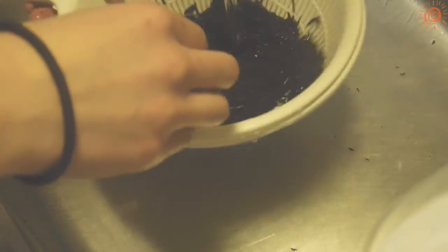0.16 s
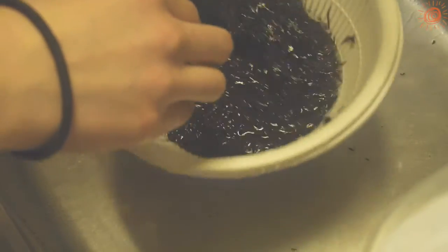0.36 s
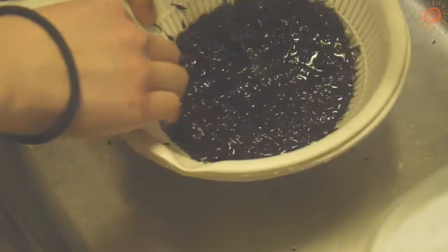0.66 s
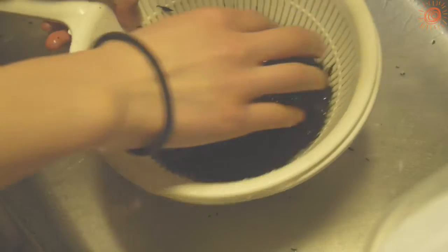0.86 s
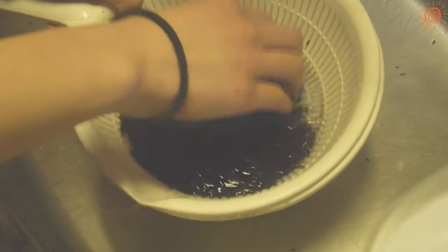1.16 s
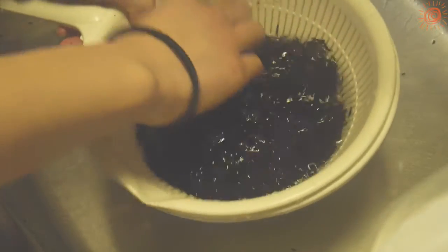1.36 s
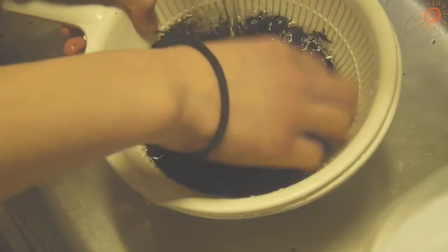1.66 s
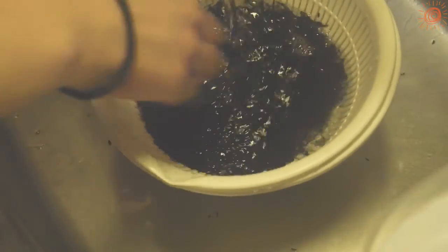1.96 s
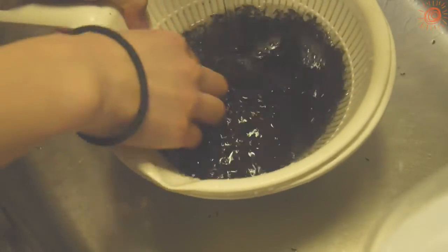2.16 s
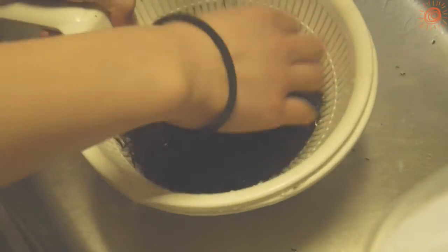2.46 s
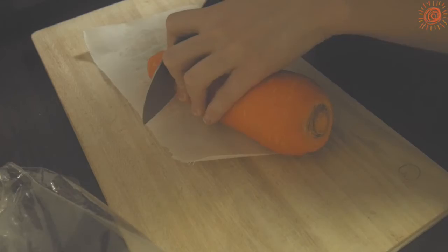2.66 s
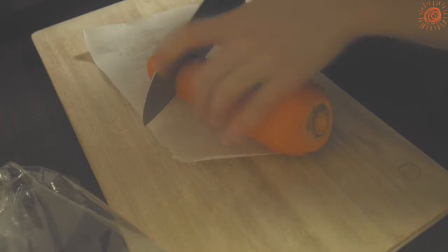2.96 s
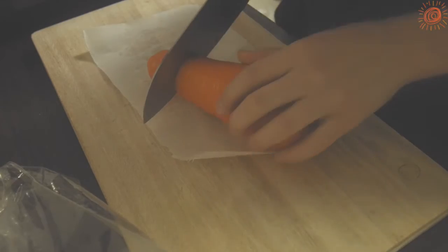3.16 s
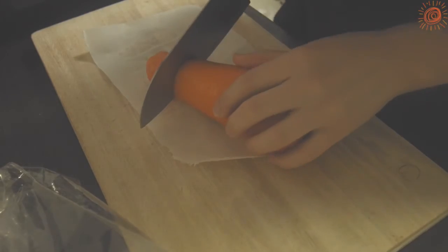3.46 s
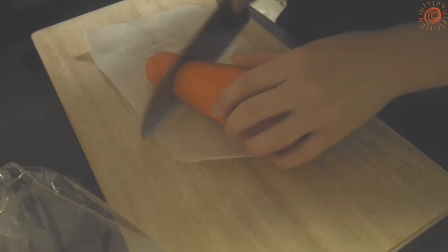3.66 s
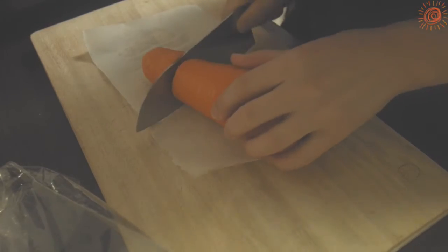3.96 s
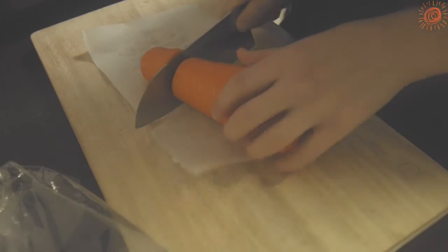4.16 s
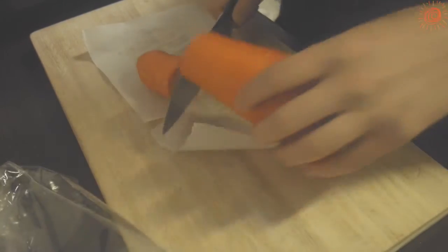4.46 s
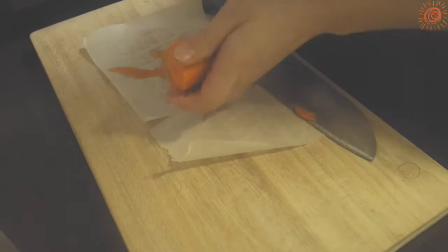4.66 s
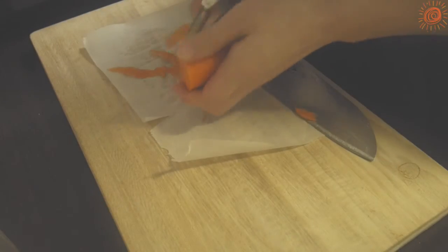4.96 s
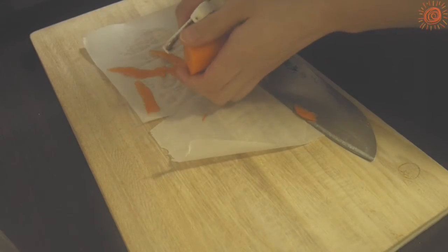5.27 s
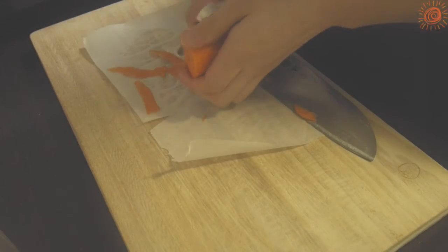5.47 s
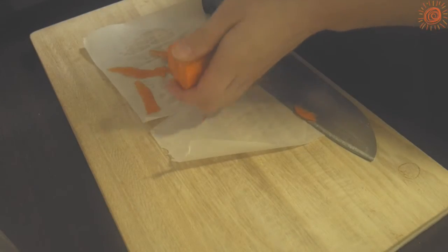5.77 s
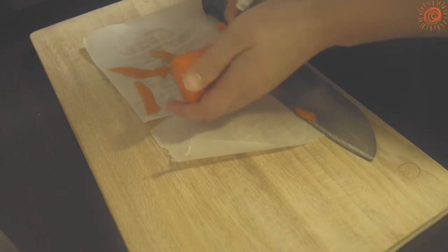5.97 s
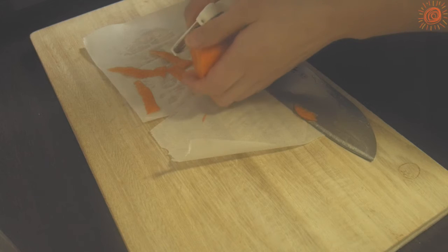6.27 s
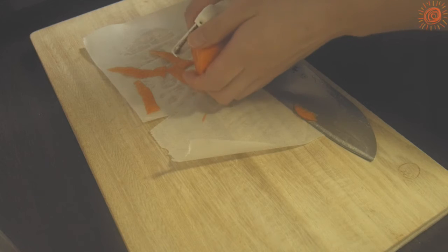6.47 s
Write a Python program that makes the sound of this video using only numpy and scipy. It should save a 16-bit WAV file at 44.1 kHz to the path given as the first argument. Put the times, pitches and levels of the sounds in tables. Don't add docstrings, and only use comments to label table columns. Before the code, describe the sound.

Bright rushing sink water stops abruptly; in a humming kitchen a blade thuds through a carrot onto wood, drags over paper, then a peeler scrapes.

```python
import sys
import numpy as np
from scipy import signal
from scipy.fft import rfft, irfft, next_fast_len
from scipy.io import wavfile
from scipy.ndimage import uniform_filter1d, map_coordinates

SR = 44100
rng = np.random.default_rng(int(sys.argv[2]) if len(sys.argv) > 2 else 0)


def gain_from_decibels(decibels):
    exponent = np.asarray(decibels, float) / 20
    return 10 ** exponent


def digitize_waveform(pressure):
    field = np.atleast_2d(pressure).T
    bounded = np.clip(field, -1, 1)
    quanta = np.round(bounded * 32767).astype(np.int16)
    wavfile.write(sys.argv[1], SR, quanta)


N = 291060
T = np.arange(N) / SR
TABLE = slice(N - 180000, N)


def unit(x):
    return x / np.sqrt(np.mean(x ** 2) + 1e-20)


def along(points, hz):
    f, v = np.transpose(points)
    return np.interp(np.log(hz + 1), np.log(f + 1), v)


def curves(rows):
    s, first, *others = np.transpose(rows)
    return [np.interp(T, s, first, -150, -150)] + [np.interp(T, s, c) for c in others]


def wobble(rate):
    return map_coordinates(rng.standard_normal(int(N * rate / SR) + 4), [T * rate])


def filtered(x, response):
    n = x.shape[-1]
    m = next_fast_len(n + 8192)
    return irfft(rfft(x, m) * response(np.fft.rfftfreq(m, 1 / SR)), m)[..., :n]


def peak(hz, centre_hz, width_hz):
    damping = 1j * hz * width_hz
    return damping / (centre_hz ** 2 - hz ** 2 + damping + 1e-9)


def body(spectrum, peaks=(), peak_db=0):
    def gain(hz):
        power = gain_from_decibels(along(spectrum, hz)) ** 2
        for centre_hz, width_hz, db in peaks:
            power = power + abs(gain_from_decibels(db + peak_db) * peak(hz, centre_hz, width_hz + 14) ** 2) ** 2
        return np.sqrt(power)
    return gain


def rush(span, gain, alike, lean, patchy_db, grit, lead=((1000, 0),), ripple_db=0):
    n = span.stop - span.start
    z = signal.stft(rng.standard_normal((2, n)), nperseg=256)[2]
    field = uniform_filter1d(rng.standard_normal(z.shape[1:]), size=3, axis=0)
    field = uniform_filter1d(field, size=12, axis=1)
    pair = signal.istft(z * gain_from_decibels(patchy_db * unit(field)), nperseg=256)[1][:, :n]
    impacts = np.interp(np.arange(n), np.arange(0, n, 40), rng.standard_normal(n // 40))
    mid, side = rfft(pair * gain_from_decibels(grit * impacts))
    hz = np.fft.rfftfreq(n, 1 / SR)
    comb = gain_from_decibels(ripple_db * np.interp(hz, np.arange(0, SR / 2, 30), rng.standard_normal(SR // 60)))
    turn = np.arccos(np.clip(along(alike, hz), -1, 1)) / 2
    mid, side = mid * np.cos(turn), side * np.sin(turn)
    halves = np.array([[.5], [-.5]])
    ports = gain_from_decibels(along(lean, hz) * halves) * np.exp(1j * along(lead, hz) * halves)
    sound = unit(irfft(np.array([mid + side, mid - side]) * ports * gain(hz) * comb, n))
    return np.pad(sound, ((0, 0), (span.start, N - span.stop)))


def add(track, s, sound):
    part = track[round(s * SR):][:len(sound)]
    part += sound[:len(part)]


def ring(hz, t60, attack):
    t = T[:SR // 2 + SR // 10]
    return np.sin(2 * np.pi * hz * t) * gain_from_decibels(-60 * t / t60) * (1 - np.exp(-t / attack))


def burst(t60, response, click=0, size=SR // 10):
    t = T[:size]
    noise = rng.standard_normal(size) * gain_from_decibels(-60 * t / t60)
    puff = filtered(noise + click * (t == 0), response)
    return puff / abs(puff).max()


def kitchen():
    # (frequency [Hz], density [dB per Hz])
    air_colour = [(13, -54.5), (22, -20), (69, -8), (146, -6), (235, -2), (428, -11.5), (558, -10.5),
                  (1500, -17.5), (1950, -52), (3300, -120)]
    # (frequency [Hz], width [Hz], level [dB])
    hum = [(85, 20, -6), (118, 14.4, 3.5), (158, 4, 9), (232.5, 8.4, 3.5), (365, 11.6, -8), (478, 12, -32),
           (660, 24, -2)]
    # (frequency [Hz], density [dB per Hz])
    faint_colour = [(710, -36.5), (1200, -11.5), (1360, -25), (1520, -10), (1620, -5.5), (2930, -13),
                    (5730, -17.5), (6240, -17.5), (7970, -19.5), (12500, -23), (13700, -40), (15200, -31)]
    # (frequency [Hz], left-right likeness [0-1])
    room_alike = [(60, 0.92), (130, 1), (290, 0.89), (640, 0.67), (1400, 0.91), (3070, 0.71), (6740, 0.46),
                  (14800, 0.417)]
    lean = [(100, 1.4), (8000, 1.1)]  # (frequency [Hz], left over right [dB])
    whirr_colour = [(500, -120), (900, -6), (2400, -4), (3100, 0), (3850, -3), (4100, -120)]
    air_db, faint_db, focus_db = -51, -63.5, -62.5
    focus_s, focus_end_s = 2.905, 4.16
    step_at_s, steps_per_s, step_fall_db = 3.16, 59.97, 45
    step_rest = .3
    drone_hz, drone_db = 561, -65

    air = gain_from_decibels(air_db) * rush(TABLE, body(air_colour, hum, peak_db=-1.0), room_alike, lean, patchy_db=0.5, grit=.4)
    faint = gain_from_decibels(faint_db) * rush(TABLE, body(faint_colour), room_alike, lean, patchy_db=1.2, grit=.4)
    whirr = rush(TABLE, body(whirr_colour), [(1000, .9)], lean, patchy_db=2, grit=2)
    drone_level = np.sqrt(2) * gain_from_decibels(drone_db + 1.5 * wobble(6))
    line = drone_level * np.sin(2 * np.pi * np.cumsum(drone_hz + 1.5 * wobble(5)) / SR)
    phase = (T - step_at_s) * steps_per_s % 1
    steps = unit(step_rest + gain_from_decibels(4.6 * wobble(40) - step_fall_db * phase))
    focus = gain_from_decibels(focus_db) * steps * whirr * (T > focus_s) * (T < focus_end_s)
    return air + line + faint + focus


def water():
    # (frequency [Hz], density [dB per Hz])
    spray_colour = [(1590, -37), (2700, -17), (3140, -12.5), (3580, -8.5), (4190, -10.5), (4820, 0),
                    (5640, -8.5), (5910, -1), (6180, 0), (7990, -6.5), (9860, -10.5), (10900, -3),
                    (13000, -29)]
    gush_colour = [(150, -57), (250, -14.5), (317, -29), (399, -6), (675, 0.5), (743, -7.5), (825, 1.5),
                   (1290, -8), (1560, -4.5), (1720, -3.5), (2450, -2.5), (3180, -22.5), (5390, -120)]
    # (frequency [Hz], width [Hz], level [dB])
    basin_low = [(588, 23, -8), (678, 14, 2), (823, 12, -5), (1141, 16, -0.5), (1727, 94, 1),
                 (1930, 150, -2.5), (2310, 93, -1)]
    basin_high = [(3501, 32, -3.5), (3914, 170, -8), (4410, 52, -4.5), (4860, 320, -5), (5340, 34, -1),
                  (5600, 33, -7), (6090, 240, -1.5), (6320, 95, -9), (7170, 60, -2), (7460, 66, -8),
                  (8220, 35, -14), (8520, 360, -7), (9050, 55, -2.5), (9830, 400, -5), (10200, 36, -9),
                  (10860, 110, -12), (11080, 48, -9), (11800, 160, -16.5), (12360, 85, -17)]
    # (frequency [Hz], density [dB per Hz])
    rumble_colour = [(13, -53), (22, -33), (75, -11.5), (182, -14.5), (232, -4), (268, -13), (322, -13),
                     (400, -9), (520, -17), (880, -120)]
    # (frequency [Hz], left-right likeness [0-1])
    sink_alike = [(60, 0.97), (130, 0.9), (300, 0.96), (640, 0.93), (1400, 0.96), (3000, 0.96),
                  (4800, 0.72), (6200, 1), (8000, 0.39), (10000, 0.56), (12500, 0.85)]
    # (frequency [Hz], left over right [dB])
    sink_lean = [(60, -1), (110, 1), (200, -1), (380, 0.5), (690, -0.5), (1280, -2.5), (2360, 0),
                 (4350, 1.2), (8030, -0.5), (14800, 4.5)]
    # (frequency [Hz], phase by which the left port leads [rad])
    sink_lead = [(4500, -0.024), (5700, 0.082), (7000, 1), (8000, 0.34), (8700, -1.3), (10000, 0.08),
                 (11100, 1.6), (13000, 0.17)]
    # (time [s], bubble peak [dB], bubble pitch [Hz], spatter above the bubble [dB])
    splashes = [
        (0.159, -25.5, 1440, 1),
        (1.3344, -19.5, 2740, -5),
        (1.647, -26, 3280, -2),
        (1.6515, -25, 3120, 4),
        (1.6648, -31, 3400, 9),
        (2.06, -34.5, 2600, 8),
        (2.066, -31.5, 1790, 9.5),
    ]
    sink = slice(0, 115200)
    spray_db, gush_db, rumble_db, spray_lowpass_hz = -28.5, -35.5, -53.5, 13060

    jets = body(spray_colour, basin_high, peak_db=4.5)
    spray = rush(sink, lambda hz: jets(hz) * (hz < spray_lowpass_hz), sink_alike, sink_lean,
                 patchy_db=1.07, grit=0.74, lead=sink_lead, ripple_db=2.0)
    gush = rush(sink, body(gush_colour, basin_low, peak_db=4.5), sink_alike, sink_lean,
                patchy_db=1.0, grit=1.9, lead=sink_lead, ripple_db=3.5)
    drops = np.zeros(N)
    for s, db, hz, spatter_db in splashes:
        add(drops, s, gain_from_decibels(db + 2) * ring(hz, 0.021, attack=.0005))
        add(drops, s, gain_from_decibels(db + spatter_db) * burst(0.06, lambda f: peak(f, hz, 3000) ** 3))
    rumble = gain_from_decibels(rumble_db) * rush(sink, body(rumble_colour), sink_alike, sink_lean, patchy_db=3.5, grit=0)
    spray_gain = gain_from_decibels(spray_db + 0.56 * wobble(10.02))
    gush_gain = gain_from_decibels(gush_db + 0.48 * wobble(12.57))
    return spray_gain * spray + gush_gain * gush + drops + rumble


def ticks():
    # (frequency [Hz], density [dB per Hz])
    tap_colour = [(1650, -39.5), (2800, -13), (4470, -3), (5530, -2), (7190, -0.5), (8590, -7),
                  (11800, -7.5), (13400, -34.5), (14200, -72.5)]
    # (time [s], peak [dB], high band [Hz], low resonance above
    # the peak [dB])
    paper_ticks = [(2.5568, -72, 10900, -20), (2.9074, -50.5, 3200, 9), (2.9615, -43.5, 9080, 3),
                   (3.105, -48.5, 6000, -20), (3.1607, -53.5, 3100, 8), (3.543, -49, 9500, -22),
                   (3.5618, -44, 10530, -13.5), (3.8822, -40, 4959, -5), (4.001, -42.5, 4500, -26),
                   (4.156, -43, 5170, -8), (4.2098, -56, 7000, -15)]
    steel_ticks = [(4.7107, -30.5, 9400, -15), (4.716, -35, 5500, -8), (4.755, -43.5, 7210, -7),
                   (5.0766, -32, 6200, -4), (5.084, -32, 7030, 2), (5.094, -46.5, 7000, 5),
                   (5.101, -50, 10200, 4), (5.2046, -38.5, 3200, -0.5), (5.2504, -55, 4350, 14),
                   (5.2599, -47, 5000, 7), (5.271, -40, 5500, 2), (5.281, -43, 10600, -9),
                   (5.3268, -48.5, 5770, 0), (5.4627, -34, 4410, -4), (5.4933, -28, 4430, -12),
                   (5.6004, -43, 4670, 2), (5.6190, -43, 8920, -2), (6.1968, -40.5, 7000, -8),
                   (6.205, -46, 10000, -14), (6.2914, -59, 3990, 10.5), (6.3744, -60, 5280, 11),
                   (6.4315, -44, 5500, -4), (6.4353, -36.5, 5300, -2), (6.4469, -32.5, 5070, -3),
                   (6.473, -49, 10000, 2), (6.5165, -44, 10600, -3), (6.5453, -38, 5160, -3),
                   (6.551, -38, 10300, 1), (6.5794, -42, 10500, -8)]
    chatter = [(4.6006, -16, 5400, -24), (4.6078, -31, 6080, -14), (4.6114, -14.5, 9600, -13),
               (4.613, -23.5, 6800, -19.5), (4.62, -29, 6800, -13), (5.7376, -20, 3800, -13),
               (5.7395, -11.5, 7200, -11), (5.7463, -23.5, 6500, -17), (5.7503, -18, 7000, -11),
               (5.7524, -19, 6300, -15), (5.7583, -28, 7000, -6), (5.7655, -30.5, 8000, -2),
               (5.7706, -28, 3700, -8)]
    # (low resonance [Hz], t60 [s])
    paper = (1200, 0.016)
    steel = (2050, 0.016)
    slip = (1650, 0.012)

    out, bright = np.zeros(N), body(tap_colour)
    for rows, (low_hz, t60) in [(paper_ticks, paper), (steel_ticks, steel), (chatter, slip)]:
        for s, db, high_hz, low_db in rows:
            puff = burst(t60, lambda f: (peak(f, high_hz, 1000) + 0.22) * bright(f), click=2.6)
            add(out, s, gain_from_decibels(db) * puff)
            add(out, s, gain_from_decibels(db + low_db) * burst(1.2 * t60, lambda f: peak(f, low_hz, 580) ** 2))
    return out


def stroke(s, swell, hold, db):
    rise_db, fall_db_per_s = 29.5, 428
    swelling = np.minimum(0, rise_db * (T - s) / swell)
    release = fall_db_per_s * np.maximum(0, T - s - hold)
    return np.maximum(db + swelling - release, -150)


def strokes():
    # (frequency [Hz], density [dB per Hz])
    hiss_colour = [(1760, -24), (3000, -14), (3760, -9), (3940, -9), (4270, -4.5), (4730, -6), (5130, -5),
                   (7260, -5), (7880, -8.5), (10300, -0.5), (12800, -14), (14200, -25), (15200, -39)]
    scrape_colour = [(350, -35.5), (600, -12), (1080, -7), (1200, 0.5), (1430, -7.5), (1630, -3),
                     (1810, -2.5), (3600, -8.5), (4680, -26), (7920, -120)]
    # (frequency [Hz], left-right likeness [0-1])
    rub_alike = [(600, 0.6), (1400, 0.99), (3000, 0.93), (5000, 0.63), (7000, .75), (9500, 0.58),
                 (13000, 0.42)]
    # (frequency [Hz], left over right [dB])
    rub_lean = [(60, 1.5), (110, 4), (200, 2), (380, 3), (690, -3), (1280, 0), (2360, 0), (4350, 1.5),
                (8030, 3.5), (14800, 6)]
    # (full pressure [s], swell [s], hold [s], hiss [dB], scrape above hiss [dB])
    rubs = [(2.963, 0.079, .01, -56, -1), (2.99, .04, 0.067, -65.5, -2), (3.115, 0.038, .002, -56, -4),
            (3.4, 0.33, .05, -66.5, -2), (3.493, 0.044, .002, -49, -4), (3.572, 0.053, 0.019, -55, -3.5),
            (5.076, 0.01, 0.02, -58, 8), (5.269, 0.036, 0.0053, -57, 2), (5.459, 0.0043, .004, -50, -5),
            (5.491, 0.0066, 0.052, -41.5, -7.5), (5.601, 0.0072, .005, -51, -10),
            (5.659, 0.069, 0.055, -40.5, -6.5), (5.735, 0.017, 0.016, -32.5, -5),
            (6.434, .014, .002, -59, 4), (6.52, .018, .002, -61, -9), (6.545, .013, .002, -52.5, 1.5),
            (6.595, 0.048, 0.011, -50, -8)]
    # (time [s], hiss [dB], scrape above hiss [dB])
    tear = [
        (3.66, -62, 1),
        (3.681, -53.5, -2),
        (3.6825, -46, -7),
        (3.688, -33.5, -16),
        (3.703, -26, -7.5),
        (3.7115, -24, 4.5),
        (3.722, -36.5, 1.5),
    ]
    # (time [s], hiss [dB], scrape above hiss [dB])
    drag = [
        (4.2, -67, -5),
        (4.25, -46, 6),
        (4.318, -30, -16.5),
        (4.376, -45, 0),
        (4.41, -37, -3.5),
        (4.534, -37, -12.5),
        (4.597, -43.5, 3),
        (4.612, -29, -11.5),
        (4.69, -78, 9),
    ]
    # (start [s], length [s], frequency [Hz], level [dB])
    sings = [(4.25, .065, 4000, -43), (4.40, .12, 10600, -44), (4.40, .11, 8800, -46),
             (4.40, .1, 7500, -44), (4.42, .12, 4950, -46), (4.31, .11, 4700, -53), (4.41, .08, 6900, -48),
             (4.598, .04, 12200, -48), (5.078, .05, 7100, -61), (4.55, .05, 4300, -49),
             (5.49, .06, 2300, -48), (5.5, .05, 4500, -50), (5.595, .06, 2250, -55), (5.69, .04, 4400, -50),
             (5.65, .07, 8900, -51), (5.745, .045, 7000, -47), (6.542, .026, 2310, -45),
             (6.505, .05, 10450, -62)]

    hiss = rush(TABLE, body(hiss_colour), rub_alike, rub_lean, patchy_db=2.6, grit=3.2, ripple_db=2.0)
    scrape = rush(TABLE, body(scrape_colour), rub_alike, rub_lean, patchy_db=1.0, grit=3.0, ripple_db=4.0)
    levels = [curves(tear), curves(drag)]
    for s, swell, hold, db, scrape_db in rubs:
        levels.append((stroke(s, swell, hold, db), scrape_db))
    hiss_gain = sum(gain_from_decibels(db) for db, _ in levels)
    scrape_gain = sum(gain_from_decibels(db) * gain_from_decibels(above_db) for db, above_db in levels)
    out = hiss_gain * hiss + scrape_gain * scrape
    for s, length, hz, db in sings:
        n = round(length * SR)
        band = filtered(rng.standard_normal(SR // 4), lambda f: peak(f, hz, 94) ** 2)[-n:]
        song = unit(band) * np.sqrt(np.hanning(n))
        add(out[0], s, gain_from_decibels(db + 4) * song)
        add(out[1], s, gain_from_decibels(db - 0.5) * song)
    return out


def chop():
    chop_at = [
        3.689,
        3.7085,
        3.7118,
    ]
    # (crack [dB], ring [dB], thud [dB])
    chop_levels = [
        (-47.5, -47, -35),
        (-23, -30.5, -47),
        (3, -18.5, -16.5),
    ]
    # (frequency [Hz], level [dB], t60 [s])
    board_modes = [(169, -11, 0.41), (333, -6.5, 0.21), (467, 10.5, 0.093), (512, -8, 0.17),
                   (580, -2, 0.19), (692, -9.5, 0.26), (830, -25, .25), (1124, -12, 0.19),
                   (1190, -6, 0.085), (1314, -25, .12), (1670, -25, .14), (1776, -24, 0.1),
                   (2170, -16.5, 0.1), (2520, -34, 0.084)]
    counter_modes = [(105.5, -19, 0.13), (216, 6.5, 0.039), (267, -2, 0.088)]
    # (frequency [Hz], width [Hz], level [dB])
    snap_bands = [(330, 290, -9.5), (1158, 150, 4.5), (1950, 510, 2.5), (4740, 450, -16),
                  (6100, 680, -11.5), (10000, 3500, -31)]
    # (frequency [Hz], width [Hz], level [dB], t60 [s])
    rattle = [(530, 460, -18, 0.43), (1700, 1800, -37, 0.9)]
    # (frequency [Hz], level [dB], t60 [s], end [s])
    blade = (345, -50.5, 3, 4.3)
    # (time [s], peak [dB], frequency [Hz], t60 [s])
    bumps = [(3.688, -29.5, 2000, 0.021), (3.708, -12, 4640, 0.011), (3.76, -28, 610, 0.052),
             (3.808, -33, 597, 0.047), (4.262, -43, 450, 0.083), (4.346, -32.5, 330, 0.065),
             (5.206, -40.5, 337, 0.072), (5.2078, -40, 460, 0.029), (4.268, -40, 875, 0.077),
             (6.197, -54, 456, .05)]

    out, landing = np.zeros(N), chop_at[2]
    wood = sum(gain_from_decibels(db) * ring(hz, t60, attack=0.000067) for hz, db, t60 in board_modes)
    counter = sum(gain_from_decibels(db) * ring(hz, t60, attack=0.0025) for hz, db, t60 in counter_modes)

    def snap(f):
        return sum((-1) ** k * gain_from_decibels(db) * peak(f, hz, width) for k, (hz, width, db) in enumerate(snap_bands))

    for s, (crack_db, ring_db, thud_db) in zip(chop_at, chop_levels):
        add(out, s, gain_from_decibels(crack_db) * burst(.006, snap, click=20))
        add(out, s, gain_from_decibels(ring_db) * wood + gain_from_decibels(thud_db) * counter)
    for hz, width, db, t60 in rattle:
        add(out, landing, gain_from_decibels(db) * burst(t60, lambda f: peak(f, hz, width) ** 2, size=SR // 3))
    hz, db, t60, end = blade
    song = ring(hz, t60, attack=0.0037)
    level = gain_from_decibels(db + 11.0 + 1.9 * wobble(13)[:len(song)])
    until_moved = np.clip((end - landing - T[:len(song)]) / .03, 0, 1)
    add(out, landing, level * song * until_moved)
    for s, db, hz, t60 in bumps:
        add(out, s, gain_from_decibels(db + 4.0) * ring(hz, t60, attack=0.00061))
    return filtered(out, lambda f: (1j * f / (70 + 1j * f)) ** 4)


def room(x):
    # (frequency [Hz], t60 [s])
    walls = [(150, 0.56), (600, 0.34), (2000, 0.38), (6000, 0.35), (12000, 0.37)]
    hz, t, z = signal.stft(rng.standard_normal((2, SR // 2)), SR, nperseg=256)
    apart = np.clip(0.083 + hz / 3000, 0, 1)[:, None]
    decay = gain_from_decibels(-60 * t / along(walls, hz)[:, None])
    ports = np.array([z[0] + apart * z[1], z[0] - apart * z[1]]) / np.sqrt(1 + apart ** 2)
    tail = signal.istft(ports * decay, SR, nperseg=256)[1]
    late = np.pad(x, (180, 0))[None]
    return signal.fftconvolve(late, tail / np.linalg.norm(tail[0]), axes=1)[:, :N]


def scene():
    change_s = 2.5472
    rubs, taps, blow = strokes(), ticks(), chop()
    board = kitchen() + rubs + gain_from_decibels([[.7], [-.7]]) * taps + gain_from_decibels([[1.1], [-1.1]]) * blow
    board = board + gain_from_decibels(-16.0) * room(rubs.mean(0)) + gain_from_decibels(-12) * room(taps) + gain_from_decibels(-14.0) * room(blow)
    after = np.clip((T - change_s) / 0.00065 + .5, 0, 1)
    return (1 - after) * water() + after * board


def roll_off(x):
    return signal.sosfilt(signal.butter(12, 15400, fs=SR, output="sos"), x)


def record(dry):
    ceiling = 1.15
    mix = dry / (1 + abs(dry / ceiling) ** 8) ** (1 / 8)
    return roll_off(mix)


dry = scene()
out = record(dry)
digitize_waveform(out)
```